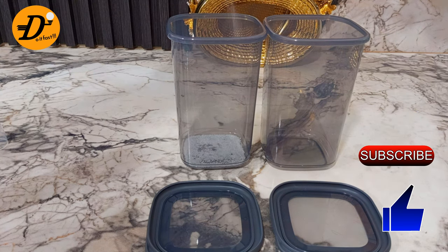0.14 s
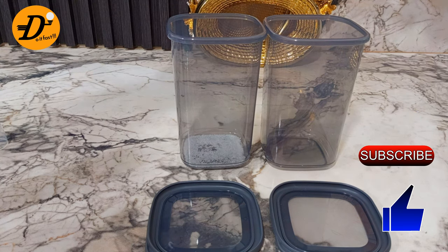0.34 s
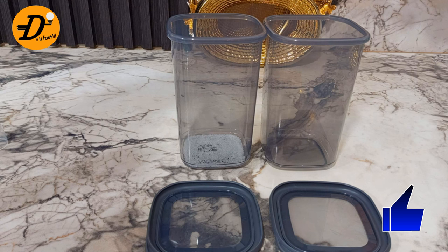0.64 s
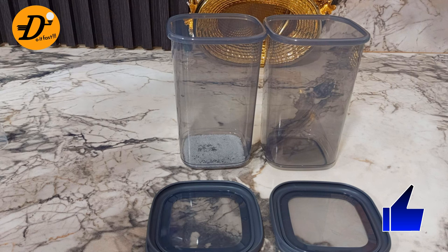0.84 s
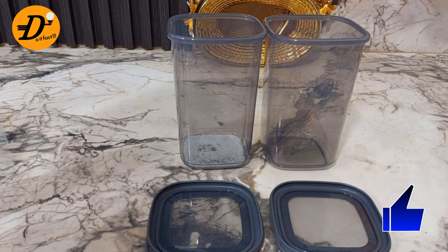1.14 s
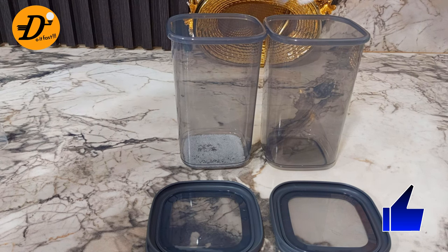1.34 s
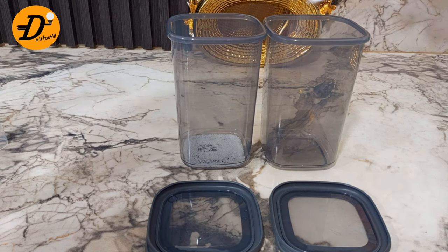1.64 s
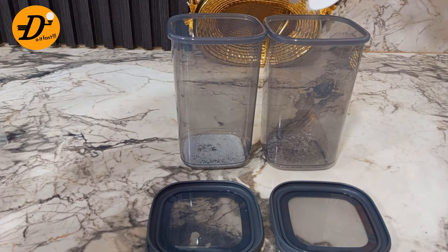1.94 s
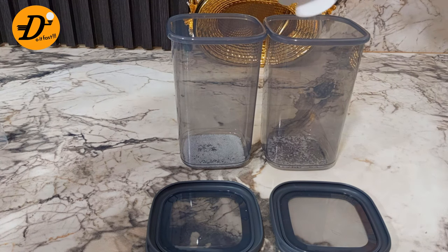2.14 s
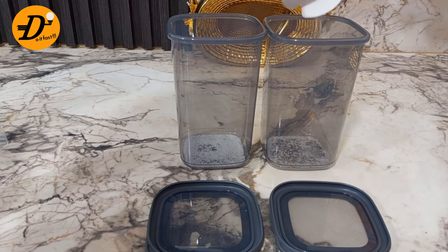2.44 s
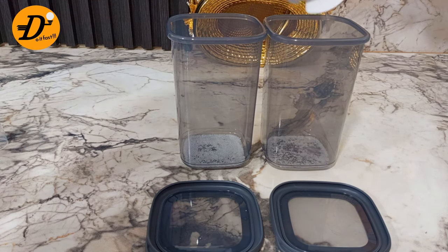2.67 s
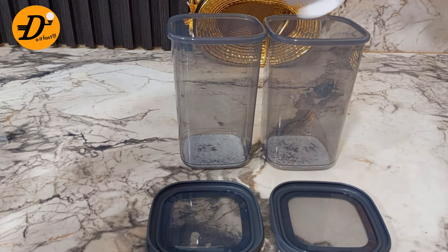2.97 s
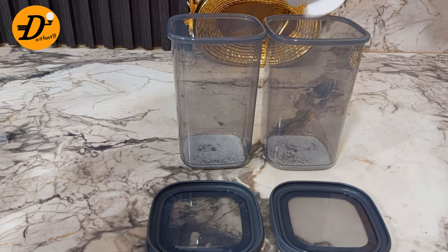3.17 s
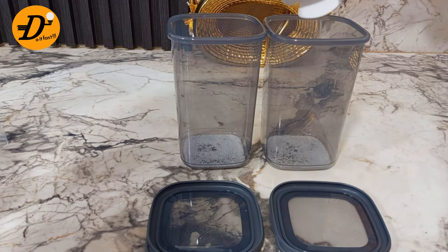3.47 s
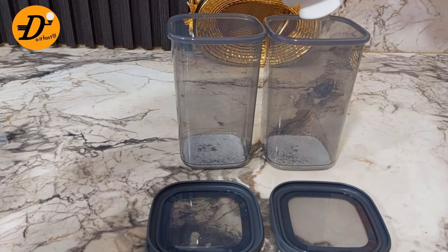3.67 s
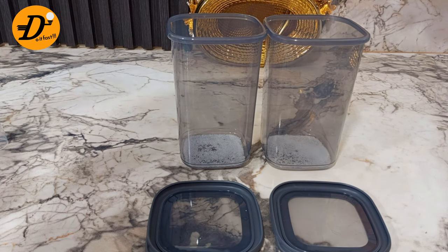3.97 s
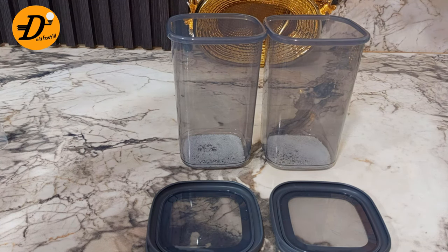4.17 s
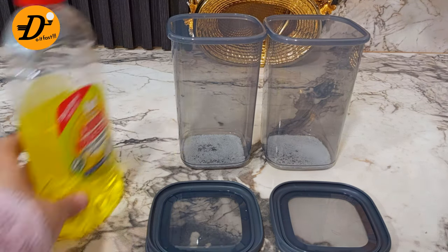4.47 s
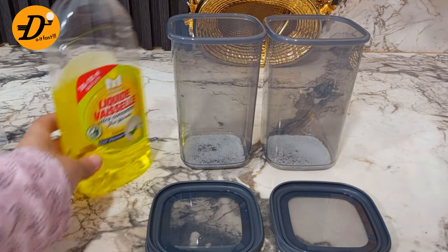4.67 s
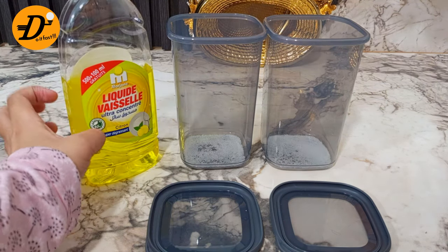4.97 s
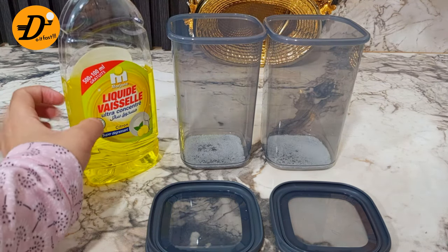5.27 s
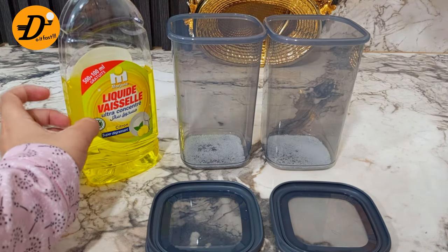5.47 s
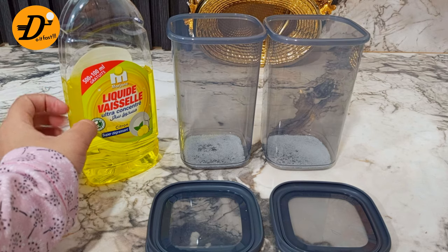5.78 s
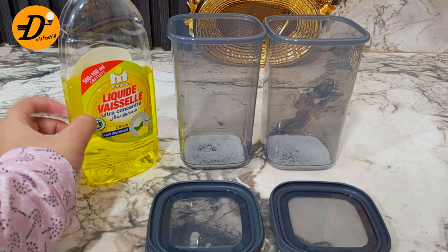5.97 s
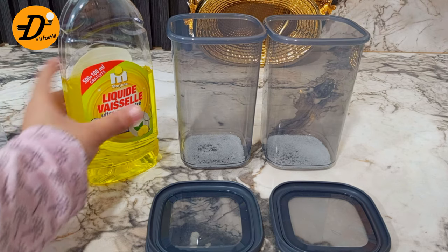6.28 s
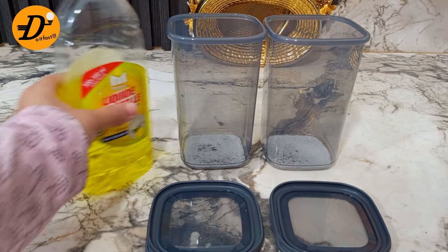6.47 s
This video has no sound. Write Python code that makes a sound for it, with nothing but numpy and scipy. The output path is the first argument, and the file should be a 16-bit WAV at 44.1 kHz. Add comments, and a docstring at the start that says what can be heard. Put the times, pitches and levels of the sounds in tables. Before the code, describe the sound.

At the start, fine grains patter off a spoon into a tall plastic tub for about a quarter of a second. The spoon then hisses through more grains, strongest around 0.7 seconds, with a few faint knocks and stray ticks. From 1.4 seconds grains are shaken into a second tub in quick spurts, ticking brightly and drumming on its bottom. The patter dulls and fades towards 4.3 seconds as the bottom is covered. A scooping hiss swells and is cut by a very brief dropout at 4.5 seconds. A sleeve brushes faintly as a full plastic bottle is brought in. From about 5.3 to 6.2 seconds fingernails tap it irregularly, each a small click with a hollow, liquid-filled knock. Soft low thuds and a rustle come at 6.5 seconds as it is picked up. Everything is close, over the faint hum and hiss of a small kitchen.

```python
"""Fine grains patter off a spoon into one tall plastic tub, then a second, on a stone kitchen counter.
Each grain ticks on the plastic and drums on the tub floor; the second floor dulls as it is covered.
The spoon hisses through the grains between pours. After a 50 ms dropout a full plastic bottle is
brought in, tapped with the fingernails and picked up. One microphone, close by, in a small quiet room."""
import sys
import numpy as np
from scipy import signal
from scipy.fft import rfft, irfft
from scipy.io import wavfile
from scipy.ndimage import uniform_filter1d

SR = 44100
rng = np.random.default_rng(int(sys.argv[2]) if len(sys.argv) > 2 else 0)


def transcribe(signal):
    """Save signal, clipped to [-1, 1], as a 16-bit WAV file at the path in sys.argv[1]."""
    frames = np.atleast_2d(signal).T
    limited = np.clip(frames, -1, 1)
    pcm = np.round(limited * 32767).astype(np.int16)
    wavfile.write(sys.argv[1], SR, pcm)


N = 291942
TIME = np.arange(N) / SR
RING = TIME[:SR // 2]  # time axis of one impact
DROPOUT_S = (4.502, 4.553)

# clumps shaken off the spoon: (time [s], level [dB], landing time [s])
SHAKES = [(0, -43.5, .005), (0.064, -44, 0.004), (.112, -48, 0.0063), (1.441, -53.5, 0.0081),
          (1.483, -35.5, 0.0063), (1.579, -36.5, 0.0048), (1.68, -34, 0.01), (1.779, -34.5, 0.0091),
          (1.884, -34, 0.0042), (1.997, -35.5, 0.0067), (2.097, -35, 0.0063), (2.136, -42.5, 0.0055),
          (2.202, -38, 0.0037), (2.253, -39, 0.0034), (2.309, -39, 0.0042), (2.485, -39, 0.0037),
          (2.526, -40.5, 0.012), (2.563, -43.5, 0.0083), (2.642, -40, 0.0084), (2.721, -47.5, 0.0082),
          (2.778, -47.5, 0.0035), (2.888, -40.5, 0.0075), (2.968, -41, 0.0067), (3.093, -42.5, 0.0054),
          (3.212, -46.5, 0.0099), (3.264, -61, 0.0044), (3.336, -48.5, 0.0084), (3.421, -44, 0.01),
          (3.556, -47, 0.0043), (3.638, -45, 0.0036), (3.766, -48, 0.009), (3.882, -49.5, .011),
          (3.972, -49, 0.0017), (4.055, -54.5, 0.0084)]
# tick of a grain on plastic: (frequency [Hz], level [dB])
TICK_COLOUR = [(2590, -48), (4400, -20), (5580, -6), (6080, 0.5), (7890, -7.5), (10200, 0), (11300, -2.5),
               (13300, -19.5), (13700, -15.5), (15100, -17.5), (16000, -5.5)]
# hiss of rubbing grains or cloth: (frequency [Hz], level [dB])
FRICTION_COLOUR = [(2590, -54), (4400, -30), (4620, -19), (5010, -10), (6180, 2), (7310, -1.5), (7930, -6),
                   (10100, 3), (11000, 0), (13600, -19), (15200, -14), (16000, -13.5)]
# crack of the second tub's bare floor, also used for spoon knocks: (frequency [Hz], level [dB])
BARE_COLOUR = [(180, -45), (300, -2), (356, -8.5), (559, -11.5), (678, -26), (743, -12), (986, 0.5),
               (1400, -6), (1640, -5.5), (1950, 7), (2700, 12), (3930, 4.5), (4500, -31), (5850, -31),
               (9900, -120)]


def undb(db):
    """Decibels to gain."""
    return 10 ** (np.asarray(db) / 20)


def unit(x):
    """Scale to rms 1."""
    return x / np.sqrt(np.mean(x ** 2))


def unit_energy(x):
    """Scale a response so that it passes white noise at the same level."""
    return x / np.sqrt(np.sum(x ** 2))


def curve(rows):
    """Gain from a (time [s], level [dB]) curve, silent outside it."""
    s, db = np.transpose(rows)
    return undb(np.interp(TIME, s, db, left=-200, right=-200))


def add(out, s, sound):
    """Mix a sound in at time s."""
    start = max(int(s * SR), 0)
    out[start:start + len(sound)] += sound[:N - start]


def through(x, response):
    """Pass a sound through an impulse response."""
    return signal.fftconvolve(x, response)[:len(x)]


def colour(points, size=4096):
    """Minimum-phase response with the given (frequency [Hz], level [dB]) spectrum."""
    hz, db = np.transpose(points)
    grid = np.maximum(np.arange(size // 2 + 1) * SR / size, 1)
    gain = undb(np.interp(np.log(grid), np.log(hz), db))
    cepstrum = irfft(np.log(gain))
    cepstrum[1:size // 2] *= 2
    cepstrum[size // 2 + 1:] = 0
    return unit_energy(irfft(np.exp(rfft(cepstrum))))


def noise(points, count=N):
    """Coloured noise of rms 1."""
    return unit(through(rng.standard_normal(count), colour(points)))


def decay(t60):
    """Gain that falls 60 dB in t60 seconds."""
    return np.exp(-np.log(1000) * RING / t60)


def burst(points, t60):
    """Dense overtones of a blow, as dying noise."""
    return noise(points, count=len(RING)) * decay(t60)


def struck(sound, db, count=1300):
    """Set the level of the first 30 ms of a blow."""
    return undb(db) * sound / np.sqrt(np.mean(sound[:count] ** 2))


def ring(modes, rise_s, detune, centre_hz=1, fall_db=0):
    """Modes swell and die away; the spot hit favours those near centre_hz, by fall_db an octave."""
    hz, db, t60 = np.transpose(modes)[:, :, None]
    size, tuning, phase = rng.standard_normal((3, len(modes), 1))
    waves = np.sin(2 * np.pi * (hz * (1 + detune * tuning) * RING + phase))
    gain = undb(db + 2 * size - fall_db * np.abs(np.log2(hz / centre_hz)))
    return (gain * waves * decay(t60)).sum(0) * (1 - np.exp(-RING / rise_s))


def shell(points, peaks, ring_db):
    """Response of a thin shell to one grain: a broad crack and its ringing."""
    crack = colour(points)
    t = RING[:len(crack)]
    ringing = sum(undb(db) * width * np.exp(-np.pi * width * t) * np.cos(2 * np.pi * hz * t)
                  for hz, width, db in peaks)
    return unit_energy(crack + undb(ring_db) * unit_energy(ringing))


def impacts(gain, most_per_s, spread_db):
    """Random impacts whose rms follows gain; a thinner stream has fewer of them."""
    chance = np.clip(most_per_s / SR * np.sqrt(gain / gain.max()), 1e-4, 1)
    sizes = unit(rng.standard_normal(N) * undb(spread_db * rng.standard_normal(N)))
    return gain * sizes * (rng.random(N) < chance) / np.sqrt(chance)


def stroke(start, attack_s, hold_s, release_s, db):
    """Gain of one hand movement: it speeds up, holds and slows down smoothly."""
    up = np.clip((TIME - start) / attack_s, 0, 1)
    down = np.clip((start + attack_s + hold_s + release_s - TIME) / release_s, 0, 1)
    return undb(db) * np.sin(np.pi / 2 * up * down) ** 2


def room_tone():
    """The quiet kitchen: a low rumble under a faint hiss."""
    # spectra of the two: (frequency [Hz], level [dB])
    rumble_colour = [(15, -44), (25, -10), (108, -2), (183, -6), (210, -6.5), (339, -11.5), (367, -9.5),
                     (402, -13.5), (539, -12.5), (592, -13.5), (1000, -19), (1300, -59), (2200, -120)]
    hiss_colour = [(590, -44), (1000, -14.5), (1080, -4.5), (1260, -7), (1340, -6.5), (1450, -7),
                   (3800, -11), (4520, -23), (4840, -19), (6180, -10), (8070, -21), (12400, -21),
                   (13400, -41), (14900, -19), (16000, -51)]
    return undb(-65.5) * noise(rumble_colour) + undb(-71) * noise(hiss_colour)


def kitchen(x, wet_db, t60):
    """Direct sound at the microphone and a short tail from counter and walls."""
    tail = rng.standard_normal(len(RING)) * decay(t60) * (1 - np.exp(-RING / 0.0085))
    return x + undb(wet_db) * through(x, unit_energy(tail))


def brushes():
    """Sleeve and bottle brush along as the hand comes and goes; the cloth adds a thin swish."""
    # hand movements: (start [s], attack [s], hold [s], release [s], level [dB], relative swish [dB])
    movements = [(4.499, 0.22, 0.037, 0.27, -64.5, -10), (6.43, 0.014, 0.034, .03, -65, -29),
                 (6.492, 0.014, 0.0088, 0.082, -63.5, -12)]
    # spectrum of the rub: (frequency [Hz], level [dB])
    rub_colour = [(150, -23), (250, -8), (414, -9), (493, -10.5), (1260, -11), (1350, -20), (1450, -10),
                  (1580, -14), (2670, -15.5), (3650, -19), (4650, -31), (6250, -24), (8120, -38),
                  (10500, -29), (16000, -55)]
    out = np.zeros(N)
    for *movement, swish_db in movements:
        gain = stroke(*movement)
        rub = through(impacts(gain, most_per_s=9000, spread_db=2), colour(rub_colour))
        out += rub + undb(swish_db) * gain * noise(FRICTION_COLOUR)
    return out


def bottle():
    """A nail clicks, the thin wall knocks, the liquid behind it booms a little later, the base thuds."""
    # finger taps: (time [s], level [dB], favoured wall frequency [Hz], relative nail click [dB])
    taps = [(4.972, -65, 1270, -2.5), (5.3645, -49.5, 650, -10), (5.4827, -48.5, 573, -14),
            (5.5559, -51.5, 550, -10.5), (5.7216, -45, 730, -17.5), (5.8, -48.5, 670, -12),
            (5.8586, -46.5, 620, -10.5), (5.984, -52, 650, -19), (6.033, -51.5, 850, -11.5),
            (6.085, -44.5, 576, -10.5), (6.205, -48, 1060, -18.5), (6.507, -62.5, 696, -3)]
    # soft bumps of hand and bottle: (time [s], level [dB], rise [s])
    bumps = [(4.245, -62.5, 0.0091), (4.572, -73, 0.0046), (4.79, -65, 0.0032), (5.215, -56.5, 0.066),
             (5.285, -54, 0.0051), (5.302, -54.5, 0.0031), (6.435, -55, 0.012), (6.47, -47, 0.022),
             (6.511, -43, 0.0097)]
    # modes of the full body, wall, nail and base: (frequency [Hz], level [dB], t60 [s])
    body_modes = [(107, -7.5, 0.32), (185.3, -2, 0.44), (221.2, -0.5, 0.21), (338, -3, 0.17)]
    wall_modes = [(426, -3.5, 0.076), (457, -6.5, 0.16), (530, -9, 0.079), (608, -11, 0.098),
                  (650, -3.5, 0.062), (730, 2.5, 0.036), (826, -3, 0.053), (896, -1, 0.038),
                  (1046, -10.5, 0.1), (1080, -2, 0.04), (1270, -13, 0.17), (1570, 0, 0.046),
                  (1554, -2, 0.042), (1580, -8, 0.097)]
    nail_modes = [(1910, -22, 0.06), (2490, -6, 0.02), (2670, 15, 0.0096), (2910, -3, 0.021),
                  (3540, 1, 0.017), (3740, -12, 0.036)]
    thud_modes = [(86, -5.5, 0.13), (110.1, -1.5, 0.16)]
    # dense overtones of wall and nail: (frequency [Hz], level [dB])
    knock_colour = [(180, -17.5), (300, -1), (557, -9.5), (745, -16), (944, -14.5), (1090, -11),
                    (1400, -13.5), (1600, -11.5), (2240, -18), (3480, -24.5), (4400, -38), (5720, -56),
                    (9680, -120)]
    nail_colour = [(2590, -24), (4400, -9), (4880, -14), (6020, 1.5), (6560, -2), (7230, -3.5),
                   (8100, -14.5), (10100, -5), (13500, -34), (16000, -31)]
    out = np.zeros(N)
    for s, db, wall_hz, nail_db in taps:
        boom_db = -8.5 * np.log2(wall_hz / 650)  # less boom where the wall is stiff and sounds high
        boom = struck(ring(body_modes, rise_s=0.0064, detune=0.0044), db + boom_db)
        wall = ring(wall_modes, rise_s=0.0018, detune=0.012, centre_hz=wall_hz, fall_db=9.5)
        knock = struck(unit(wall) + undb(-6.5) * unit(burst(knock_colour, t60=0.16)), db)
        click = struck(ring(nail_modes, rise_s=0.00049, detune=0.021), db + nail_db)
        tick = struck(burst(nail_colour, t60=0.08), db + nail_db - 6.5)
        thud = struck(ring(thud_modes, rise_s=0.0059, detune=0.01), db - 7.5)
        add(out, s, boom + knock + click + tick + thud)
    for s, db, rise_s in bumps:
        firmness = 0.0057 / rise_s  # softer bumps boom less
        thud = struck(ring(thud_modes, rise_s, detune=0.003), db)
        boom = firmness * struck(ring(body_modes, rise_s, detune=0.0094), db)
        add(out, s, thud + boom * np.exp(-RING / 0.085))  # the hand damps the wall
    return out


def strays():
    """Loose grains drop while the loaded spoon is carried over."""
    carrying = 1. * ((TIME > 0.95) & (TIME < 1.29))
    return undb(-71) * through(impacts(carrying, most_per_s=900, spread_db=2), colour(TICK_COLOUR))


def scoops():
    """Grains rub past each other round the spoon: a smooth hiss over a hollow body, and a few knocks."""
    # spoon strokes: (start [s], attack [s], hold [s], release [s], hiss [dB], relative body [dB])
    movements = [(0.19, 0.075, 0.28, 0.14, -54.5, -10), (0.52, .16, 0.076, 0.16, -43.5, -14.5),
                 (0.887, 0.0038, .004, 0.095, -59, -9), (1.273, 0.031, 0.02, 0.073, -51.5, -9),
                 (1.371, 0.028, 0.067, 0.088, -52.5, -12.5), (4.258, 0.28, 0.036, .01, -38.5, -12),
                 (4.442, 0.034, 0.015, 0.0087, -51, -3)]
    # hollow body of the spoon in its packet: (frequency [Hz], level [dB])
    body_colour = [(290, -96), (500, -13), (637, -36), (667, -13), (1020, -18), (1480, -14.5), (3750, -2),
                   (4600, -30), (5980, -49), (10100, -120)]
    # its resonances: (frequency [Hz], width [Hz], level [dB])
    body_peaks = [(1080, 370, -20), (1700, 150, -6), (2320, 200, 7), (3300, 270, -26), (3820, 470, 7)]
    # the spoon knocks the packet: (time [s], level [dB], damping time [s])
    knocks = [(0.895, -66.5, 0.079), (1.012, -77, .01), (1.289, -57, 0.0039), (4.455, -55, 0.057)]
    # modes of a knock: (frequency [Hz], level [dB], t60 [s])
    knock_modes = [(970, 3, 0.073), (1100, 0, 0.18), (1160, -4, 0.3), (1740, -2, .06), (2380, -8, 0.027),
                   (2840, -5, .04), (3820, 0, 0.031)]
    hiss_gain = sum(stroke(*movement) for *movement, _ in movements)
    body_gain = sum(stroke(*movement) * undb(body_db) for *movement, body_db in movements)
    body = through(body_gain * rng.standard_normal(N), shell(body_colour, body_peaks, ring_db=-7))
    out = hiss_gain * noise(FRICTION_COLOUR) + body
    for s, db, damping_s in knocks:
        ringing = unit(ring(knock_modes, rise_s=0.00085, detune=0.029))
        crack = undb(-0.5) * unit(burst(BARE_COLOUR, t60=0.035))
        add(out, s, struck((ringing + crack) * np.exp(-RING / damping_s), db))
    return out


def spurts(depth_db, size=900):
    """Gain of an uneven flow: random levels held about 20 ms and smoothed."""
    held = np.repeat(rng.standard_normal(N // size + 1), size)[:N]
    return undb(depth_db * uniform_filter1d(held, size))


def stalls(depth_db, lift_s=0.018):
    """Gain of the trickle: it thins as the spoon is lifted, lift_s before each shake."""
    lifted = np.zeros(N)
    lift = np.sin(np.pi / 2 * np.minimum(RING / lift_s, 2)) ** 2
    for s, *_ in SHAKES:
        if s > 2 * lift_s:
            add(lifted, s - 2 * lift_s, lift)
    return undb(depth_db * np.minimum(lifted, 1))


def clumps(softness, bounce_s, bounce_db=-1.5, scatter_s=0.034):
    """Power of the shaken clumps: each lands at once, then its grains bounce and scatter."""
    power = np.zeros(N)
    bouncing = (1 - np.exp(-RING / bounce_s)) ** 2 * np.exp(-RING / scatter_s)
    for s, db, land_s in SHAKES:
        age = RING / (softness * land_s)
        landing = age ** 2 * np.exp(2 - 2 * age)
        add(power, s, undb(db) ** 2 * (landing + undb(bounce_db) * bouncing))
    return power


def tub_floor(blows, points, peaks, ring_db, spot_db=3, detune=0.024, spot_count=8):
    """The stream wanders over a tub floor; each spot favours other resonances and loads them a little."""
    hold = SR // 25
    spots = np.repeat(rng.integers(0, spot_count, N // hold + 1), hold)[:N]
    out = np.zeros(N)
    for spot in range(spot_count):
        offsets = rng.standard_normal((len(peaks), 2))
        favoured = [(hz * (1 + detune * tuning), width, db + spot_db * size)
                    for (hz, width, db), (tuning, size) in zip(peaks, offsets)]
        out += through(blows * (spots == spot), shell(points, favoured, ring_db))
    return out


def pours():
    """Trickle and clumps tick on the plastic and drum on the floor of one tub, then of the other."""
    # trickle off the spoon, one curve for each tub: (time [s], level [dB])
    trickles = [
        [(0, -56.5), (.09, -50.5), (.22, -50.5), (.27, -62)],
        [(1.42, -59), (1.53, -45.5), (2.25, -44), (2.8, -46.5), (3.3, -48.5), (3.9, -53), (4.1, -56.5),
         (4.34, -54.5)],
    ]
    # crack of a grain on the first floor and on the covered second: (frequency [Hz], level [dB])
    first_colour = [(180, -23.5), (300, -18), (504, -13), (649, -29), (789, -11), (1030, -10.5), (1250, -2),
                    (1450, -13), (1630, 0), (1830, -4), (3650, -3.5), (4700, -34), (6110, -30),
                    (10300, -120)]
    covered_colour = [(180, -34.5), (300, -10.5), (467, -4), (678, -11.5), (921, 2), (1080, -20),
                      (1220, -2.5), (1450, -8), (1640, 5), (1820, -10.5), (2250, 4.5), (3840, -3),
                      (4500, -43), (5850, -25), (9900, -120)]
    # resonances of the two floors: (frequency [Hz], width [Hz], level [dB])
    first_peaks = [(530, 66, -1.5), (890, 150, -2), (1260, 150, 3.5), (1330, 44, 0), (1600, 120, 1),
                   (2070, 240, 1), (2430, 57, 6), (3370, 75, 4.5), (3550, 140, -21)]
    second_peaks = [(950, 97, -6), (1026, 150, 4), (1270, 120, -4.5), (1648, 100, 10.5), (1700, 71, 2),
                    (2234, 26, 12), (2430, 22, -4), (2447, 31, 12.5), (2510, 70, 10.5), (2860, 22, -8),
                    (2940, 19, 3), (3253, 99, 10), (3500, 51, 1), (3866, 60, 8.5)]
    in_first = TIME < 1
    cover = np.interp(TIME, (1.9, 3.4), (0, 1))  # share of the second floor under grains
    flow = sum(curve(rows) for rows in trickles) * spurts(depth_db=1)
    tick_flow = flow * stalls(depth_db=-1.5)
    drum_flow = flow * stalls(depth_db=-7) * undb(-5.5 - 4 * cover)  # the layer cushions the trickle
    # the floor answers the first impact; the ticking builds as grains hit each other
    tick_power = tick_flow ** 2 + clumps(softness=0.92, bounce_s=0.0072)
    drum_power = drum_flow ** 2 + undb(-5) ** 2 * clumps(softness=0.75, bounce_s=0.014)
    ticks = impacts(np.sqrt(tick_power), most_per_s=28000, spread_db=-0.5)
    blows = impacts(np.sqrt(drum_power), most_per_s=6500, spread_db=-1)
    first = undb(0.5) * tub_floor(blows * in_first, first_colour, first_peaks, ring_db=1)
    # more and more grains land on the growing layer, which dulls the floor
    on_layer = rng.random(N) < cover
    bare = tub_floor(blows * ~in_first * ~on_layer, BARE_COLOUR, second_peaks, ring_db=-1.5)
    covered = tub_floor(blows * on_layer, covered_colour, second_peaks, ring_db=-4.5)
    return through(ticks, colour(TICK_COLOUR)) + first + bare + covered


def scene():
    """Grains, then the bottle, close by over the room tone, the same in both channels."""
    pouring = kitchen(pours() + scoops() + strays(), wet_db=-9.5, t60=0.069)
    pouring *= TIME < np.mean(DROPOUT_S)
    handling = kitchen(bottle() + brushes(), wet_db=-5, t60=0.16)
    return np.tile(pouring + handling + room_tone(), (2, 1))


def record(dry):
    """The microphone thins the deep bass; the sound drops out before the bottle; the top is cut."""
    low_cut = signal.butter(3, 53, "high", fs=SR, output="sos")
    top_cut = signal.ellip(12, 0.2, 80, 15750, fs=SR, output="sos")
    live = (TIME < DROPOUT_S[0]) | (TIME > DROPOUT_S[1])
    gate = uniform_filter1d(1. * live, size=130)  # 3 ms fades
    return signal.sosfilt(top_cut, signal.sosfilt(low_cut, dry) * gate)


dry = scene()
out = record(dry)
transcribe(out)
```